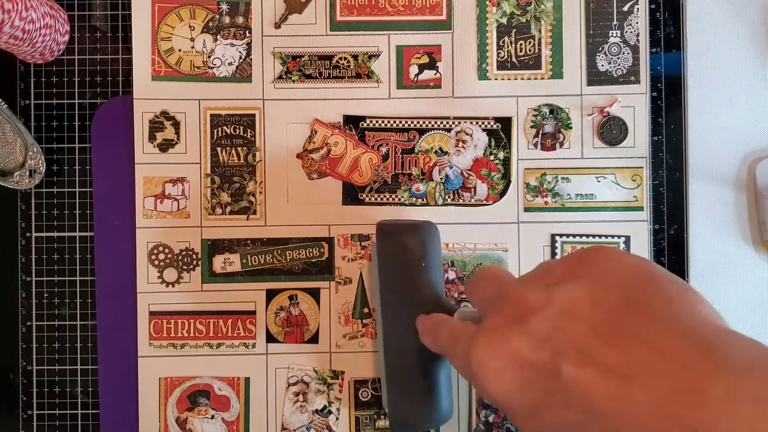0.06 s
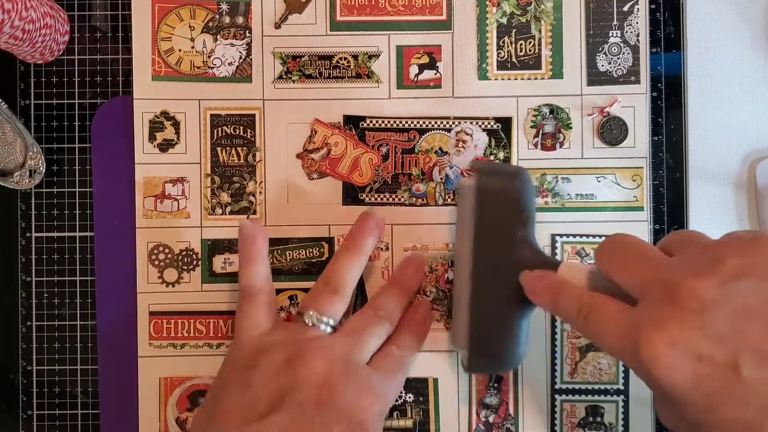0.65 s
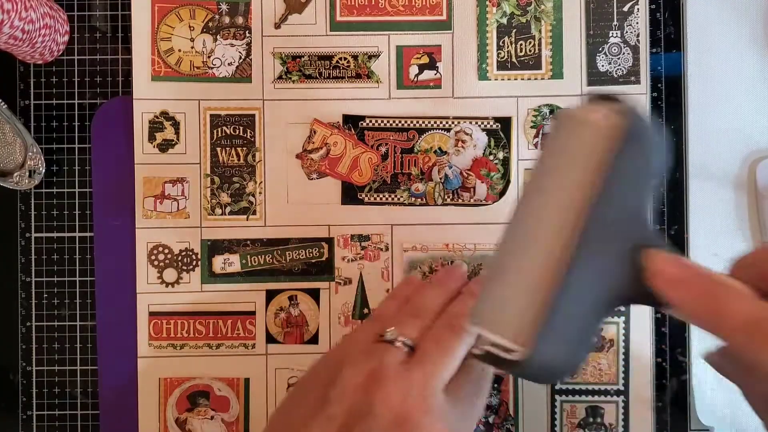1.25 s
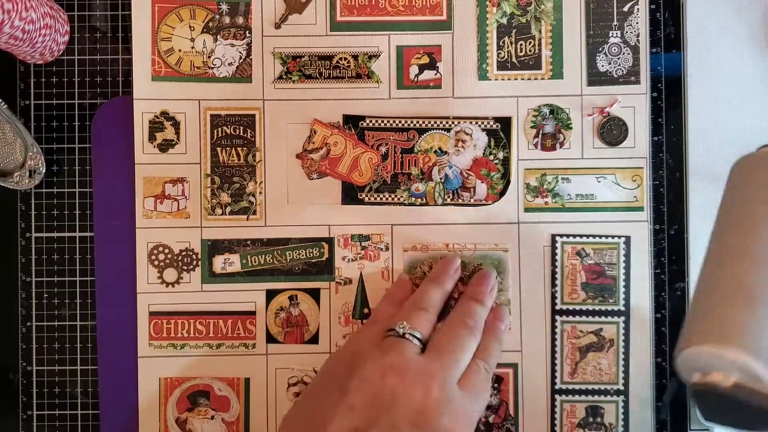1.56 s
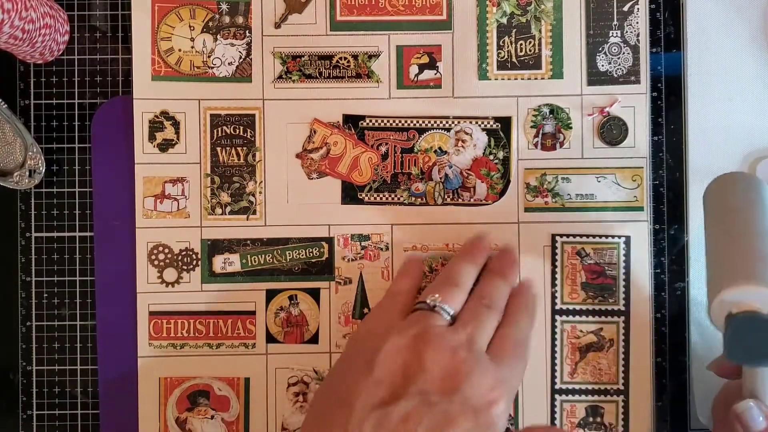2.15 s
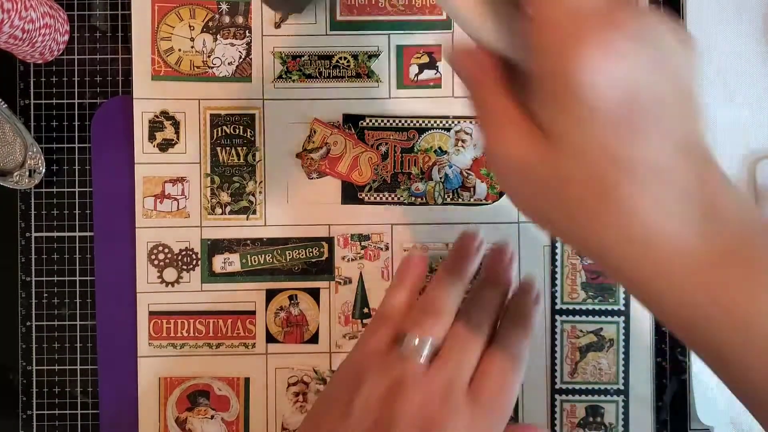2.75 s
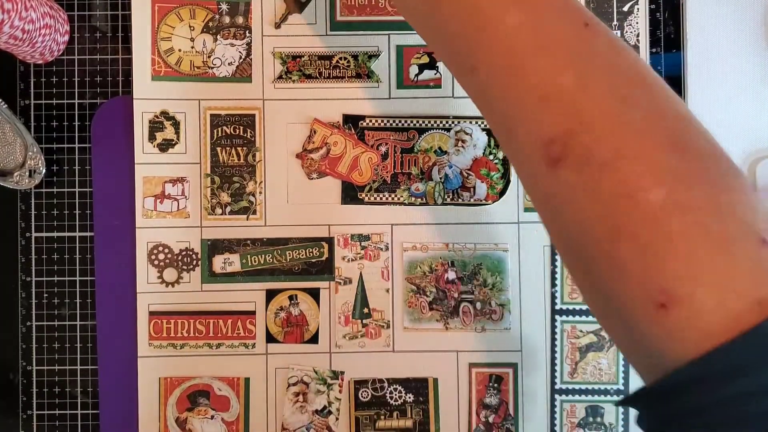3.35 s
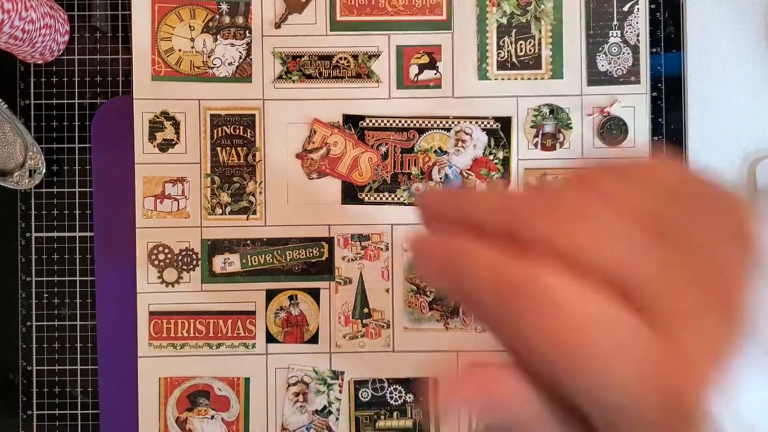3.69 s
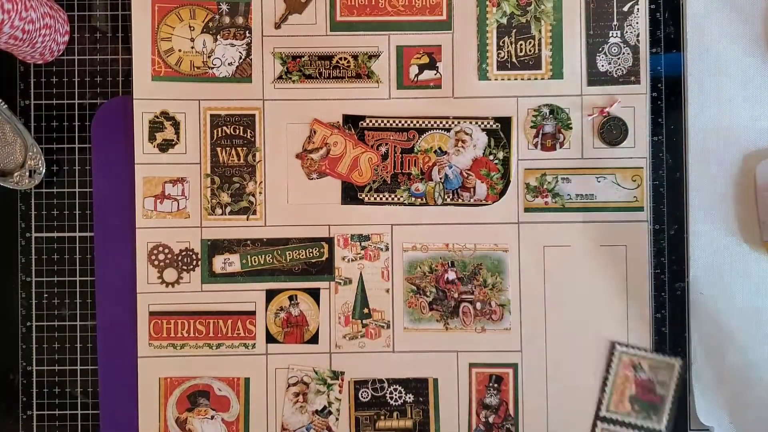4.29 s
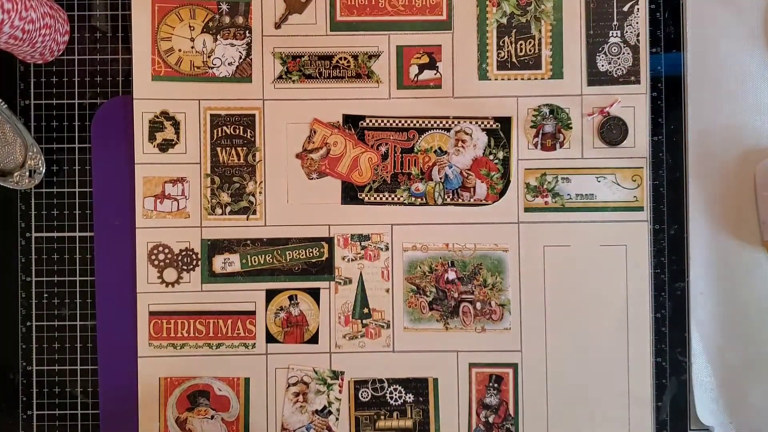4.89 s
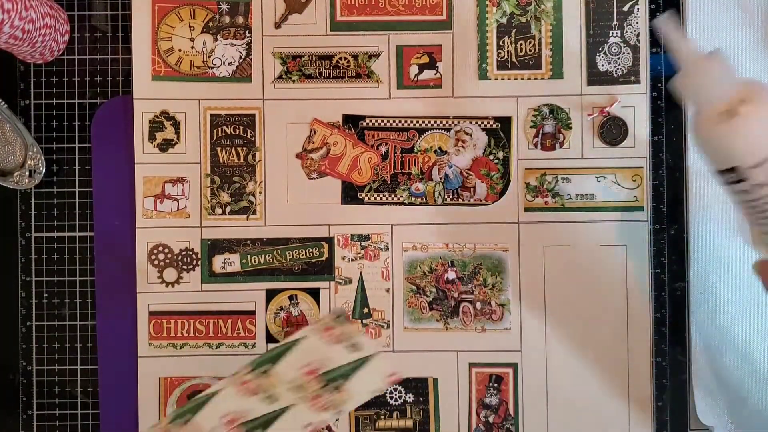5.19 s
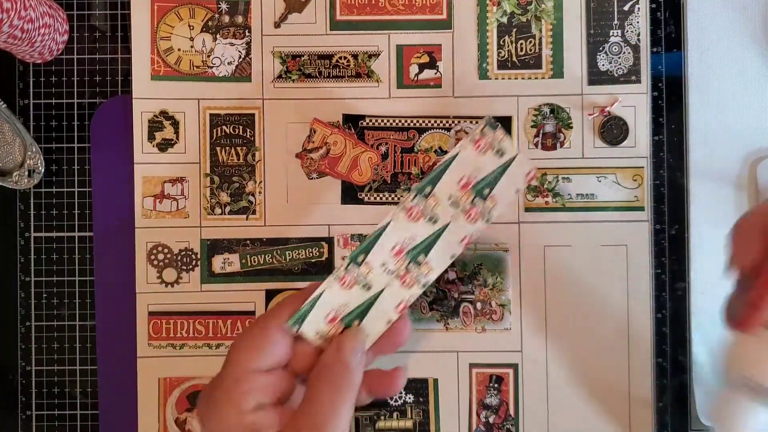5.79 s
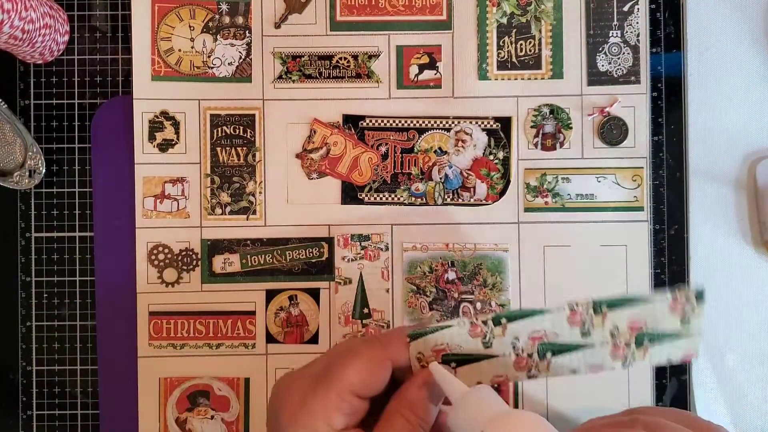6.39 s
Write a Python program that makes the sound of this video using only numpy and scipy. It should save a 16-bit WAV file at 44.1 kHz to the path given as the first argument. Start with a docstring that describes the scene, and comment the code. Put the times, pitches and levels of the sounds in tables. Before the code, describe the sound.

In a small, dry room, a microphone on a work table picks up two quick, hollow clacks from a hand roller, each with a low thump. Faint brushing and ticking follow as fingers smooth a sheet of paper. The roller is put down on a shelf with a short clatter and a loud final knock. A paper strip is then slid away and handled in brief, crisp rustles, mostly on the left, over faint hiss.

```python
"""Over a low tremble and faint hiss, a rubber roller runs across glued paper and knocks twice in its
plastic frame: the axle clicks, the shell clacks, the frame rings and the craft table booms. A hand
smooths the sheet, nails ticking, and the roller clatters and skids onto a hard shelf. Then a paper
strip is slid off, picked up and handled, its fibres rustling as they catch and let go.
The room is small and dry; the microphone stands on the table and hears the treble mostly on its left."""
import sys
import numpy as np
from scipy import signal
from scipy.fft import rfft, irfft, next_fast_len
from scipy.io import wavfile

SR = 44100
rng = np.random.default_rng(int(sys.argv[2]) if len(sys.argv) > 2 else 0)


def master(y):
    """Save y as 16-bit WAV."""
    cut = np.clip(np.atleast_2d(y).T, -1, 1)
    pcm = np.round(cut * 32767)  # scale
    wavfile.write(sys.argv[1], SR, pcm.astype(np.int16))


N = 292824
TIME = np.arange(N) / SR
FREQS = np.fft.rfftfreq(N, 1 / SR)
LN_1000 = np.log(1000)   # a fall of 60 dB
ROOM_T60_S, WALL_CUT_HZ, TOP_HZ = 0.22, 6400, 15900
CLICK_ROOM_DB, HAND_ATTACK_S = -6, 0.008


def from_db(db):
    """Decibels to gain."""
    return 10 ** (np.asarray(db) / 20)


def rms_one(x):
    """Normalise to unit RMS."""
    return x / np.sqrt(np.mean(x ** 2) + 1e-20)


def at_hz(curve, hz):
    """Read a curve along a log frequency axis."""
    points_hz, values = np.transpose(curve)
    return np.interp(np.log(hz + 1), np.log(points_hz), values)


def butter(x, order, hz, kind="low"):
    """Butterworth filter."""
    return signal.sosfilt(signal.butter(order, hz, kind, fs=SR, output="sos"), x)


def colour(x, spectrum):
    """Minimum-phase EQ, rolled off at both ends; white noise keeps its power."""
    size = 2 * next_fast_len(N // 2 + SR // 2)
    hz = np.fft.rfftfreq(size, 1 / SR)
    roll_off = (1 + (spectrum[0][0] / (hz + 1)) ** 2) * (1 + (hz / TOP_HZ) ** 20)
    gain = rms_one(from_db(at_hz(spectrum, hz)) / roll_off)
    cepstrum = irfft(np.log(gain))
    cepstrum[1:size // 2] *= 2
    cepstrum[size // 2 + 1:] = 0
    return irfft(rfft(x, size) * np.exp(rfft(cepstrum)))[..., :N]


def drift(per_s):
    """Smooth random modulation with a spread near 1."""
    knots = rng.standard_normal(int(N / SR * per_s) + 2)
    return np.interp(TIME * per_s, np.arange(len(knots)), knots)


def impulses(times, levels_db):
    """One impulse for each blow."""
    out = np.zeros(N)
    out[np.round(times * SR).astype(int)] = from_db(levels_db)
    return out


def ring(force, modes):
    """A blow sets each mode ringing as a decaying sine."""
    out = np.zeros(N)
    for hz, db, t60 in modes:
        r, w = from_db(-60 / (t60 * SR)), 2 * np.pi * hz / SR
        out += from_db(db) * signal.lfilter([0, np.sin(w)], [1, -2 * r * np.cos(w), r * r], force + 1e-18)
    return out


def through_spring(force, hz, t60):
    """A blow passed through a springy part arrives spread over a few cycles."""
    r, w = from_db(-60 / (t60 * SR)), 2 * np.pi * hz / SR
    band_pass = np.array([1, 0, -1]) * (1 - r * r) / 2
    return signal.lfilter(band_pass, [1, -2 * r * np.cos(w), r * r], force + 1e-18)


def burst(start, db, t60, room_db, attack_s=0.00039, build_s=0.0027):
    """Surfaces chatter as they meet and the walls scatter a duller tail; two unrelated noise strands."""
    age = TIME[:SR // 2]
    contact, tail = rng.standard_normal((2, 2, len(age)))
    contact *= (1 - np.exp(-age / attack_s)) * np.exp(-np.minimum(LN_1000 * age / t60, 20))
    tail *= (1 - np.exp(-age / build_s)) * np.exp(-LN_1000 * age / ROOM_T60_S)
    tail = np.sqrt(t60 / ROOM_T60_S) * butter(tail, 1, WALL_CUT_HZ)
    hit = from_db(db) * (contact + from_db(room_db) * tail)
    return np.pad(hit, ((0, 0), (int(start * SR), N)))[:, :N]


def stroke(start, length, swell_db, attack_s, release_t60):
    """Envelope of a rub: it takes hold, swells or eases, then dies away."""
    out = np.zeros(N)
    during = (TIME > start) & (TIME < start + length + release_t60)
    age = TIME[during] - start
    held_db = swell_db * np.minimum(age / length, 1) - max(swell_db, 0)
    release = np.exp(-LN_1000 * np.maximum(age - length, 0) / release_t60)
    out[during] = (1 - np.exp(-age / attack_s)) * from_db(held_db) * release
    return out


def friction(spectrum, grains_per_s, size_db, flutter_db, split_hz=7000):
    """Fibres catch and let go: uneven grains over an equal hiss, split into body and crisp top."""
    caught = rng.random(N) < grains_per_s / SR
    sizes = from_db(size_db * np.minimum(rng.exponential(1, N), 4))
    grains = rms_one(caught * sizes * rng.standard_normal((2, N)))
    texture = rms_one(grains + rng.standard_normal((2, N)))
    rub = colour(texture * from_db(flutter_db * drift(70)), spectrum)
    body = signal.sosfiltfilt(signal.butter(4, split_hz, fs=SR, output="sos"), rub)
    return body, rub - body


# Stereo image: f/Hz, left-right correlation/0-1
STEREO_LIKENESS = [(150, 0.92), (600, 1), (1300, 1), (5000, 0.4), (15000, 0)]


def spread(strands):
    """Two unrelated strands become left and right: narrow in the bass, wide in the treble."""
    mid, side = rfft(strands)
    alike = np.clip(at_hz(STEREO_LIKENESS, FREQS), 0, 1)
    return irfft(mid * np.sqrt((1 + alike) / 2) + side * np.sqrt((1 - alike) / 2) * [[1], [-1]], N)


def lean(x, balance):
    """Pan each frequency to the left; the two gains always add up to 2."""
    ratio = from_db(at_hz(balance, FREQS))
    return irfft(rfft(x) * 2 * np.array([ratio, np.ones_like(ratio)]) / (1 + ratio), N)


# EQ of the table's tremble and of the hiss: f/Hz, relative level/dB
TREMBLE_EQ = [(20, -16.5), (42, -1.5), (70, -1.5), (88, -4), (104, 6), (125, -10), (160, -21.5),
              (230, -25.5), (330, -24), (500, -43)]
HISS_EQ = [(88, -28), (150, -3), (201, -16), (302, -10.5), (437, -20), (971, -28), (2670, -34),
           (3800, -22.5), (4700, -27), (6160, -20.5), (7340, -38), (8570, -33), (13200, -34), (14800, -29),
           (15700, -29)]
# Pan of the background bed: f/Hz, left over right/dB
BED_PAN = [(110, 2.8), (700, 0.99), (2000, 4.6), (5000, 15), (9000, 4.4), (15000, 5)]


def background(tremble_db=-53.5, bearing_db=2.5, hiss_db=-72, whine_hz=14846, whine_db=-83.5):
    """The table trembles, more when a hand bears on it, under faint hiss and a thin electrical whine."""
    presses = [stroke(t, length, 0, HAND_ATTACK_S, release_t60=0.8)
               for t, length, *_ in HAND_STROKES + STRIP_STROKES]
    tremble = spread(colour(rng.standard_normal((2, N)), TREMBLE_EQ))
    tremble *= from_db(tremble_db + bearing_db * np.max(presses, axis=0))
    hiss = from_db(hiss_db) * spread(colour(rng.standard_normal((2, N)), HISS_EQ))
    whine_rms = from_db(whine_db + 2.5 * drift(15))
    whine = whine_rms * np.sqrt(2) * np.sin(2 * np.pi * whine_hz * TIME)
    return lean(tremble + hiss + whine, BED_PAN)


# Roller hits in its frame: t/s, boom level/dB, ring level/dB, click level/dB, click t60/s
ROLLER_HITS = [(0.131, -60, -53, -70, .01), (.172, -47, -56, -63, 0.016), (0.6687, -9.5, -27, -11, 0.022),
               (0.7228, -49, -39, -26, 0.014), (0.7252, -8.5, -4, -20, 0.016),
               (0.7335, -45, -30, -30, 0.014), (0.856, -58, -50, -51, 0.014),
               (0.906, -47.5, -50, -55, .025), (.934, -51.5, -48, -57, 0.06),
               (1.356, -50.5, -57, -60, 0.044), (2.228, -38, -52, -56, 0.033),
               (2.688, -64, -52, -55, 0.028)]
# EQ of the axle click and of the shell's many short-lived modes: f/Hz, relative level/dB
AXLE_EQ = [(200, -7), (1000, -25.5), (1800, -18.5), (2800, -9), (3300, -9), (3800, 1.5), (4400, 2),
           (5000, -12), (6400, -17), (7500, -32), (11000, -27.5), (15500, -29)]
SHELL_EQ = [(400, -5), (800, -3.5), (1100, -2.5), (1450, -1), (2100, -13), (2750, -2), (3600, -6.5),
            (6000, -10.5), (7500, -25), (15000, -26.5)]
# Ring of the plastic frame: f/Hz, relative level/dB, t60/s
FRAME_RING = [(313, -18.5, 0.13), (503, -24.5, 0.0794), (603, -23, 0.122), (1100, -26, 0.041),
              (1425, -28, 0.11), (1660, -29, 0.051)]


def roller(clack_vs_ring_db=-15, hollow_hz=602, hollow_db=4.5):
    """The axle clicks in its seat, the shell clacks, the hollow frame rings and the table booms."""
    times, boom_db, ring_db, click_db, click_t60 = np.transpose(ROLLER_HITS)
    click = sum(burst(*hit, CLICK_ROOM_DB) for hit in zip(times, click_db, click_t60))
    clack = sum(burst(t, db + clack_vs_ring_db, t60=0.038, room_db=-7) for t, db in zip(times, ring_db))
    snap = spread(colour(click, AXLE_EQ) + colour(clack, SHELL_EQ))
    force = impulses(times, ring_db)
    air_push = through_spring(force, hollow_hz, t60=0.016)   # the air inside takes a moment to swell
    frame = ring(force, FRAME_RING) + ring(air_push, [(hollow_hz, hollow_db, 0.025)])
    return snap, frame, table_boom(times, boom_db, swell_t60=0.099, sway_db=14)


# Boom of the tabletop and sway of the whole table on its legs: f/Hz, relative level/dB, t60/s
TABLE_RING = [(80, -14.5, 0.25), (111.3, 3.5, 0.18), (149.5, -13, 0.25), (193, -4.5, 0.14)]
TABLE_SWAY = [(40.5, -21.5, 0.54)]


def table_boom(times, levels_db, swell_t60, sway_db):
    """Blows arrive through the table's frame, so the boom blooms; the push also sways the table."""
    main_hz = TABLE_RING[1][0]
    push = through_spring(impulses(times, levels_db), main_hz, swell_t60)
    return ring(push, TABLE_RING) + from_db(sway_db) * ring(push, TABLE_SWAY)


# Hand and sleeve on the sheet: t/s, length/s, level before trim/dB, swell/dB, crispness/dB
HAND_STROKES = [(0.29, .1, -78, -2, 8), (0.9, .07, -74, 0, -6), (1.1, .06, -70, 5, 4),
                (1.342, .03, -62.5, 0, 7), (1.697, .125, -56.5, 4, 2), (1.935, .06, -66, -2, -2),
                (2.115, .04, -68, 0, 6), (2.22, .015, -65, 0, 6), (2.6, .53, -68, 9, 1),
                (2.68, .04, -70, -3, 4), (3.135, .21, -57, -12, 2), (3.595, .055, -69, 4, 10),
                (4.935, .03, -65, 3, -4)]
# EQ of skin on paper: f/Hz, relative level/dB
SKIN_EQ = [(300, -1.5), (1000, -3), (2500, -6.5), (4000, -1), (6300, -5.5), (7300, -19.5), (10000, -9),
           (15500, -12.5)]


def hand(trim_db=3):
    """Skin and cloth brush over the glued sheet; a light, dry touch gives more treble."""
    body, top = friction(SKIN_EQ, grains_per_s=4700, size_db=1.5, flutter_db=1.8)
    out = 0
    for t, length, db, swell_db, crisp_db in HAND_STROKES:
        envelope = stroke(t, length, swell_db, HAND_ATTACK_S, release_t60=0.23)
        out += from_db(db + trim_db) * envelope * (body + from_db(crisp_db) * top)
    return spread(out)


# Nail and paper-edge ticks: t/s, level/dB, t60/s
TICK_HITS = [(1.155, -56, 0.019), (1.356, -67, 0.024), (1.644, -59.5, 0.067), (1.701, -50.5, 0.045),
             (2.227, -68, .02), (2.477, -50.5, 0.022), (4.087, -40, 0.011), (4.517, -49, 0.076),
             (4.364, -44, .015), (5.237, -35, 0.024), (6.24, -50, 0.023)]
# EQ of a tick: f/Hz, relative level/dB
TICK_EQ = [(300, -5), (1500, -15.5), (2800, -10), (4000, -1.5), (5000, -5), (6400, -0.5), (7500, -42),
           (10000, -7), (15500, -9)]


def ticks():
    """Nails and paper edges snap lightly against the sheet."""
    snaps = sum(burst(*hit, CLICK_ROOM_DB) for hit in TICK_HITS)
    return spread(colour(snaps, TICK_EQ))


def softened(x, top_hz):
    """A soft contact is dull: a low-pass with 3 dB of ripple and a peak at its top."""
    return signal.sosfilt(signal.cheby1(3, 3, top_hz, fs=SR, output="sos"), x + 1e-18)


# Roller hits the shelf: t/s, boom level/dB, ring level/dB, clatter level/dB, clatter t60/s, top f/Hz
SHELF_HITS = [(3.139, -32.5, -52, -35, 0.044, 11700), (3.155, -38.5, -39, -19.5, 0.085, 1857),
              (3.177, -40, -35, -31.5, 0.03, 998), (3.248, -33, -37, -38.5, 0.49, 1800),
              (3.269, -31.5, -47.5, -48, .05, 1200), (3.328, -39, -55.5, -41, 0.17, 2090),
              (3.3513, -37.5, -43.5, -35, 0.096, 9000), (3.359, -46.5, -36.5, -31.5, 0.084, 1800),
              (3.3744, -10, -12, -4, 0.039, 15070)]
# EQ of the clatter: f/Hz, relative level/dB
CLATTER_EQ = [(250, -13.5), (600, 1), (1300, -6.5), (1700, -8.5), (2700, -1.5), (4200, -1.5), (6300, -5),
              (7500, -15), (9500, -7.5), (12000, -13.5), (15500, -19.5)]
# Ring of the shelf board: f/Hz, relative level/dB, t60/s
BOARD_RING = [(186.3, -4, 0.082), (300.6, -13.5, 0.33), (332.9, -1, 0.11), (358.6, -10.5, 0.19),
              (516, -14, 0.24), (566, -7.5, 0.069), (672, -9, 0.1), (812, -12, .07), (879, -5, 0.055),
              (1148, -15.5, 0.15), (1840, -13, 0.022), (2510, -9, 0.078), (2530, -13, 0.059),
              (3457, -13, 0.07)]


def shelf(low_cut_hz=140):
    """The roller touches, skids, rocks and drops flat; the board rings and the table booms."""
    contacts, force = 0, 0
    for t, _, ring_db, clatter_db, t60, top_hz in SHELF_HITS:
        contacts += softened(burst(t, clatter_db, t60, room_db=-5.5), top_hz)
        force += softened(impulses(t, ring_db), top_hz)
    clatter = spread(colour(contacts, CLATTER_EQ)) + skid()
    board = butter(ring(force, BOARD_RING), 2, low_cut_hz, "high")
    times, boom_db, *_ = np.transpose(SHELF_HITS)
    return clatter, board, table_boom(times, boom_db, swell_t60=0.08, sway_db=-10.5)


def skid(start_s=3.1558, from_hz=1200, to_hz=1900, rise_s=0.003, db=-27, t60=0.09, octave_db=-12):
    """Rubber sticks and slips on the shelf, faster and faster: a rough, rising chirp."""
    age = np.maximum(TIME - start_s, 0)
    glide_hz = to_hz + (from_hz - to_hz) * np.exp(-age / rise_s)
    slip_hz = glide_hz * (1 + 0.083 * drift(900))
    phase = 2 * np.pi * np.cumsum(slip_hz * (age > 0)) / SR
    envelope = from_db(db + 2.5 * drift(700)) * np.exp(-np.minimum(LN_1000 * age / t60, 20))
    return envelope * (np.sin(phase) + from_db(octave_db) * np.sin(2 * phase))


# Strip moves: t/s, length/s, level/dB, swell/dB, crispness before trim/dB,
# flex f/Hz, flex level before trim/dB
STRIP_STROKES = [(4.096, 0.18, -39, 8, 3, 5400, -10.5), (4.28, 0.036, -56, -13, 14, 4900, -15),
                 (4.326, 0.0216, -51, 6, 1.5, 5300, -2), (4.42, 0.041, -74, 6, 14, 4300, 5),
                 (4.503, 0.066, -54, -4, 4.5, 3980, -4.5), (4.613, 0.092, -69.5, -1, 2.5, 3790, -3),
                 (4.763, 0.1, -56.5, 7.5, 9, 5200, -0.5), (4.89, 0.072, -55.5, 3, 7, 4300, -15),
                 (5.034, 0.059, -66, -1.5, 6.5, 4900, 5), (5.113, 0.098, -66, -2, 6, 3700, 6.5),
                 (5.243, 0.091, -59, -4.5, 1, 3500, -2), (5.344, 0.089, -50.5, 14, 4, 4720, -14),
                 (5.48, 0.034, -61.5, -5, 2, 3900, -13), (5.653, 0.17, -66.5, 1, 0.5, 3500, -26),
                 (5.936, 0.091, -58.5, 6, 4, 4015, -4.5), (6.049, 0.087, -61, 2, 6, 3500, -7),
                 (6.233, 0.015, -55.5, -8, 3, 3690, -2), (6.271, 0.063, -73, -5, -18, 3400, -2)]
# EQ of paper on paper: f/Hz, relative level/dB
PAPER_EQ = [(400, -37), (1150, -23), (1550, -16.5), (2200, -14.5), (3000, -4.5), (3800, -1.5), (5200, -1),
            (6400, -1.5), (7200, -16.5), (8500, -8.5), (10000, -7.5), (12000, -8.5), (14500, -4),
            (16000, -5.5)]


def paper_strip(crisp_trim_db=3, flex_trim_db=-3):
    """The strip slides and turns in the fingers; a sharper edge on the sheet gives more treble."""
    body, top = friction(PAPER_EQ, grains_per_s=6000, size_db=-5, flutter_db=1.5)
    starts, lengths, *_, flex_hz, _ = np.transpose(STRIP_STROKES)
    flex = flexing(np.interp(TIME, starts + lengths / 2, flex_hz))   # glides from stroke to stroke
    out = 0
    for t, length, db, swell_db, crisp_db, _, flex_db in STRIP_STROKES:
        rustle = body + from_db(flex_db + flex_trim_db) * flex + from_db(crisp_db + crisp_trim_db) * top
        out += from_db(db) * stroke(t, length, swell_db, attack_s=0.012, release_t60=0.14) * rustle
    return spread(out)


def flexing(hz, width_hz=1170, wander_octaves=0.14):
    """The strip's free end resonates: a narrow band of rustle that wanders as it bends."""
    noise = rng.standard_normal((2, N)) + 1j * rng.standard_normal((2, N))
    swing = butter(noise, 2, width_hz / 2)
    centre_hz = hz * 2 ** (wander_octaves * drift(12))
    carrier = np.exp(2j * np.pi * np.cumsum(centre_hz) / SR)
    return rms_one(np.real(swing * carrier))


def room(x, low_hz=220, build_s=0.0096):
    """Dense reflections of a small room, duller than the direct sound."""
    age = TIME[:SR // 2]
    tail = spread(rng.standard_normal((2, N)))[:, :len(age)]
    tail *= np.exp(-LN_1000 * age / ROOM_T60_S) * (1 - np.exp(-age / build_s))
    tail /= np.sqrt(np.sum(tail ** 2) / 2)
    tail = butter(tail, 1, [low_hz, WALL_CUT_HZ], "band")
    return signal.fftconvolve(x, tail, axes=1)[:, :N]


# Pan of the table bus and of the shelf bus: f/Hz, left over right/dB
TABLE_PAN = [(110, 3), (400, 7), (1200, 12), (2400, 12.5), (4400, 23), (6500, 22), (9000, 1), (12000, 8.5),
             (15000, 16.5)]
SHELF_PAN = [(110, 2.8), (400, 5), (1200, 6.4), (2400, 14), (4400, 14.97), (6500, 29), (9000, 1),
             (12000, 3.3), (15000, 13)]


def scene(rub_send_db=-4.5, frame_send_db=-19, board_send_db=-11):
    """Table and shelf buses over the bed; frame and board ring close to the microphone, nearly dry."""
    snap, frame, knock_boom = roller()
    clatter, board, shelf_boom = shelf()
    rubs = hand() + paper_strip()
    reflections = room(from_db(rub_send_db) * rubs + from_db(frame_send_db) * frame)
    on_table = snap + frame + ticks() + rubs + reflections + knock_boom
    on_shelf = clatter + board + from_db(board_send_db) * room(board[None]) + shelf_boom
    return lean(on_table, TABLE_PAN) + lean(on_shelf, SHELF_PAN) + background()


def record(dry, low_cut_hz=32):
    """The microphone drops the deepest bass and clips at full scale; the top is cut steeply."""
    clipped = np.clip(butter(dry, 2, low_cut_hz, "high"), -1, 1)
    return signal.sosfilt(signal.ellip(10, .1, 80, TOP_HZ, fs=SR, output="sos"), clipped)


dry = scene()
out = record(dry)
master(out)
```